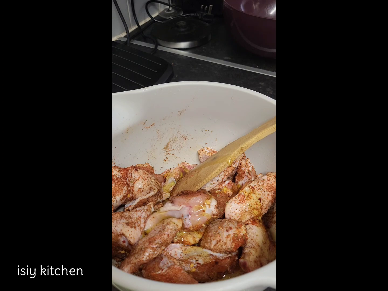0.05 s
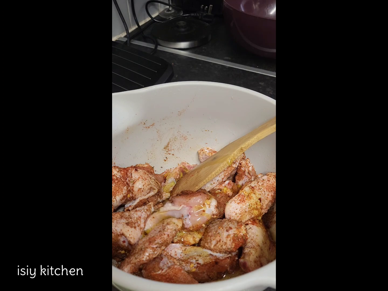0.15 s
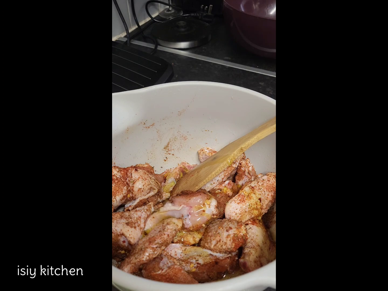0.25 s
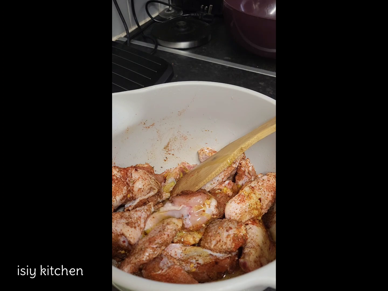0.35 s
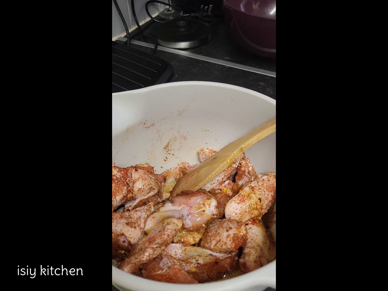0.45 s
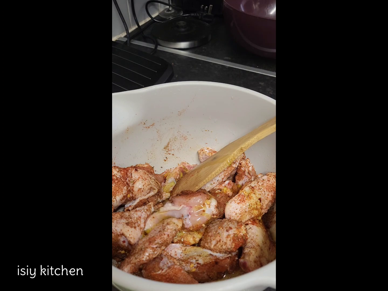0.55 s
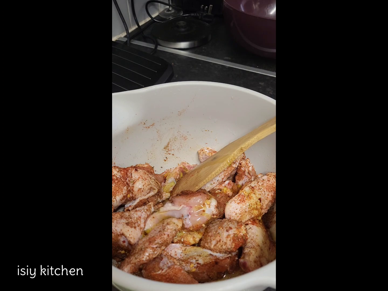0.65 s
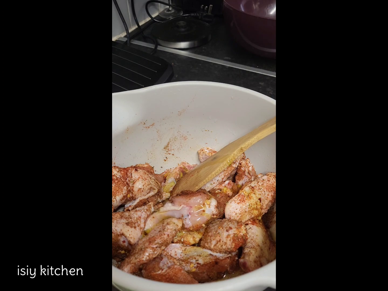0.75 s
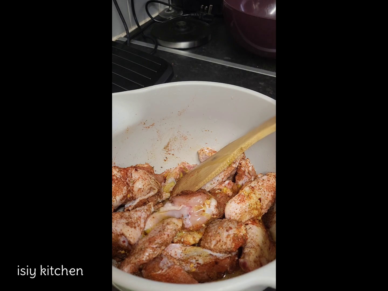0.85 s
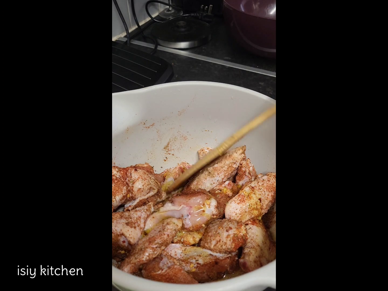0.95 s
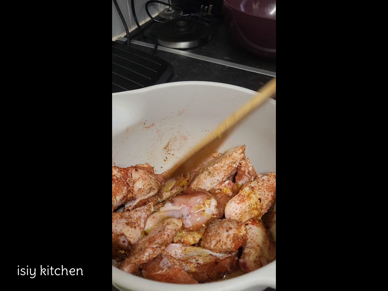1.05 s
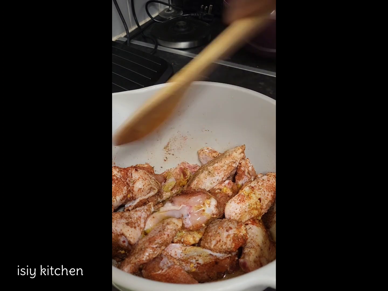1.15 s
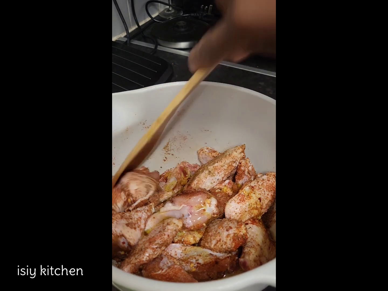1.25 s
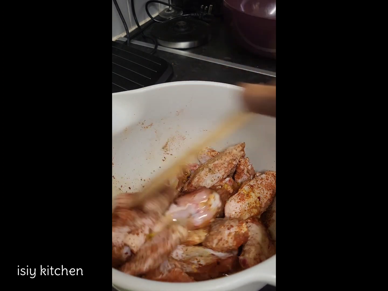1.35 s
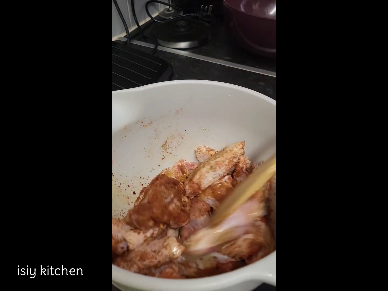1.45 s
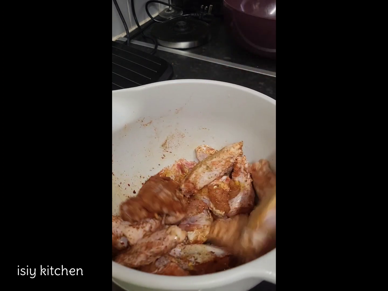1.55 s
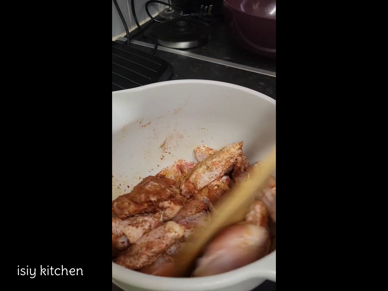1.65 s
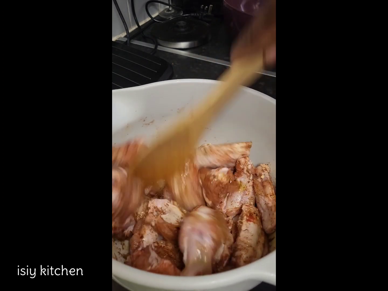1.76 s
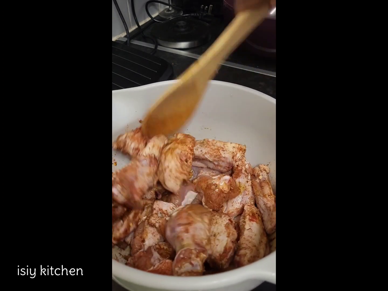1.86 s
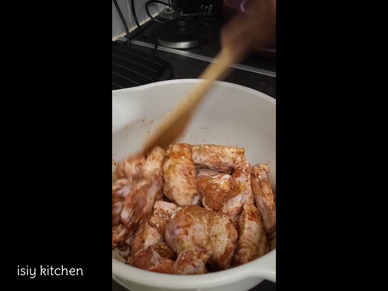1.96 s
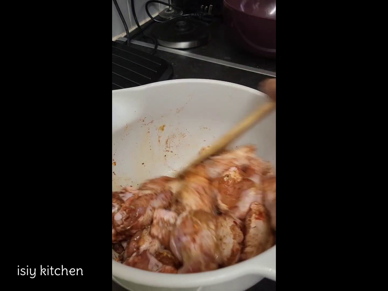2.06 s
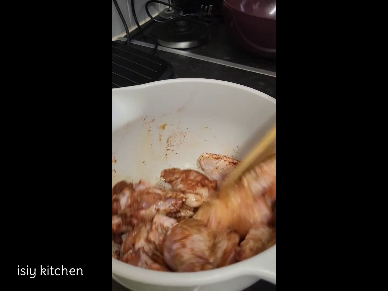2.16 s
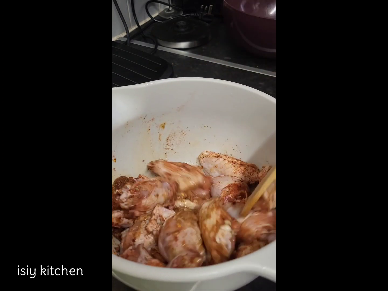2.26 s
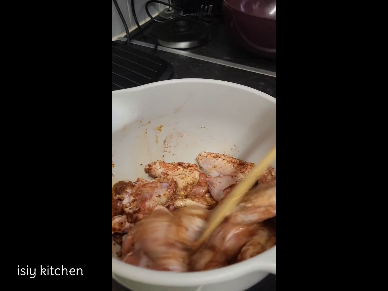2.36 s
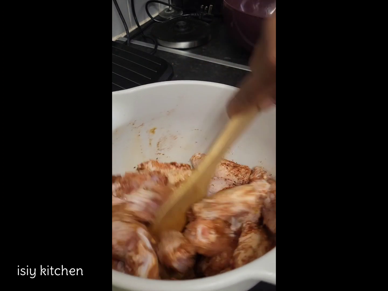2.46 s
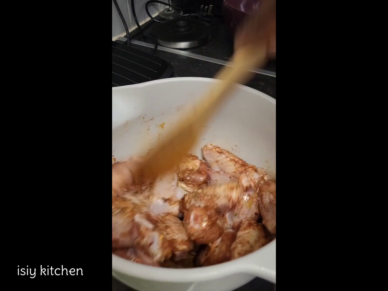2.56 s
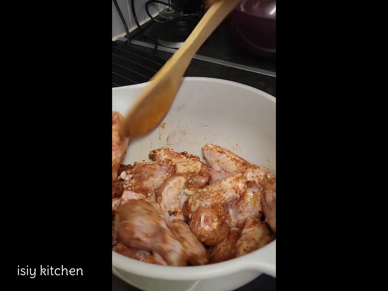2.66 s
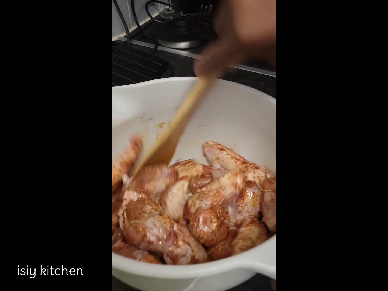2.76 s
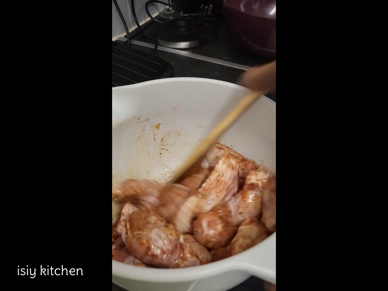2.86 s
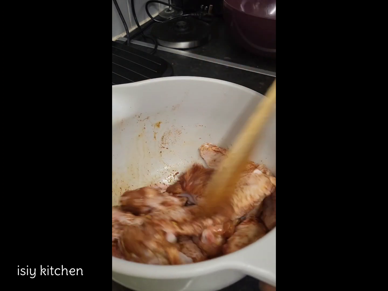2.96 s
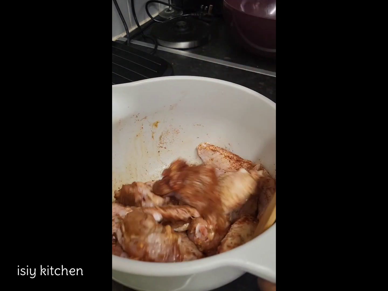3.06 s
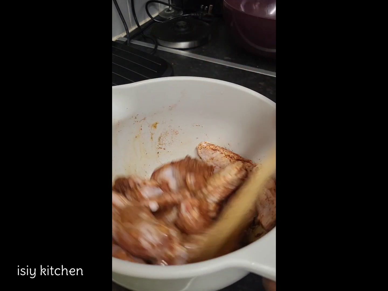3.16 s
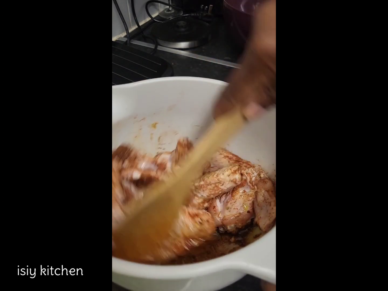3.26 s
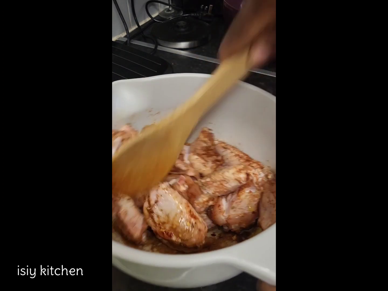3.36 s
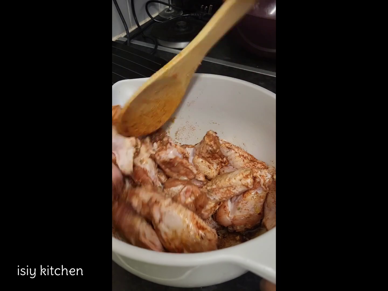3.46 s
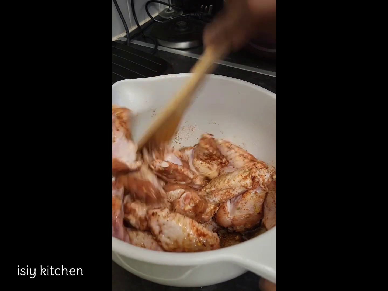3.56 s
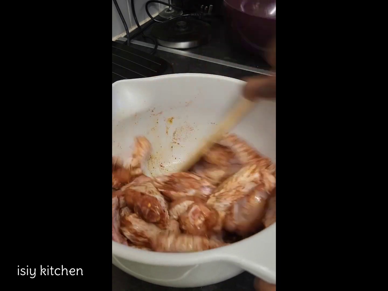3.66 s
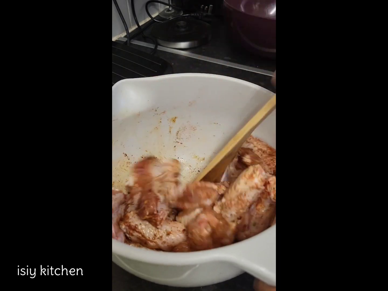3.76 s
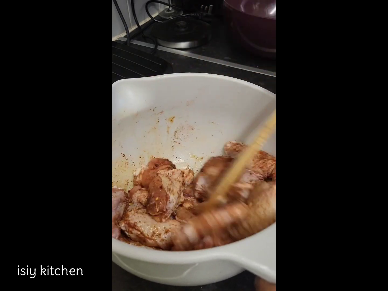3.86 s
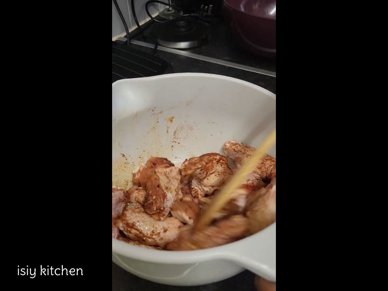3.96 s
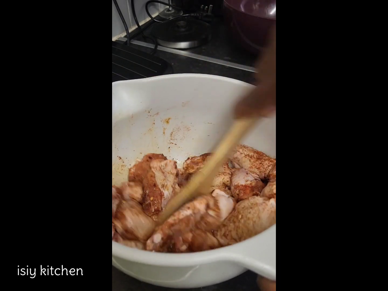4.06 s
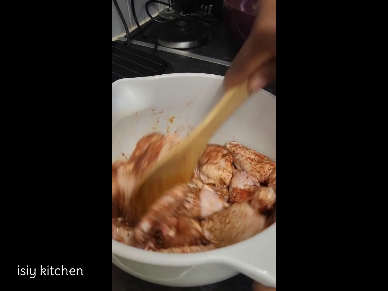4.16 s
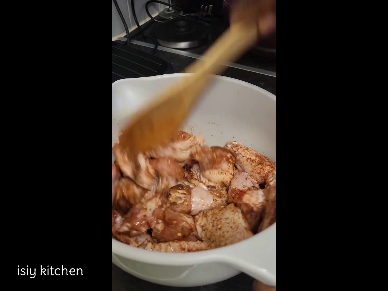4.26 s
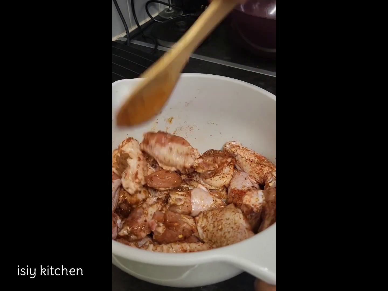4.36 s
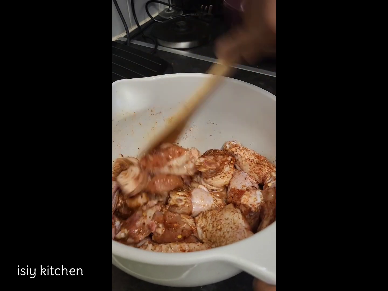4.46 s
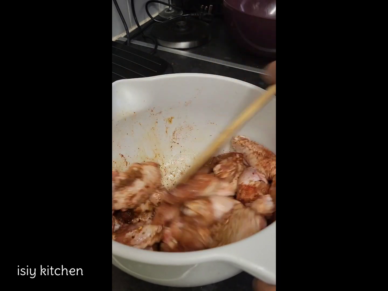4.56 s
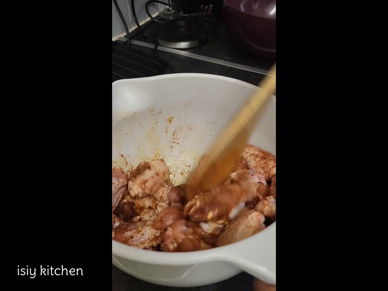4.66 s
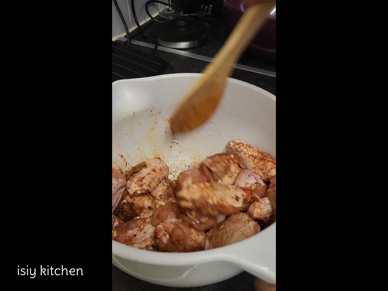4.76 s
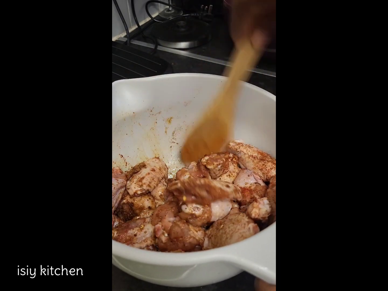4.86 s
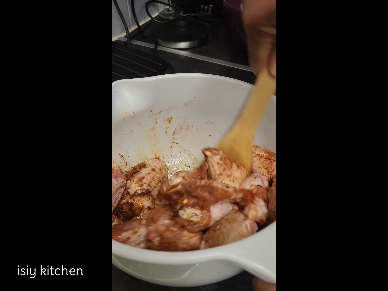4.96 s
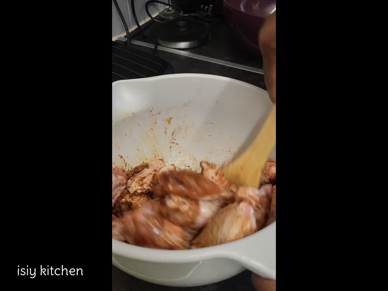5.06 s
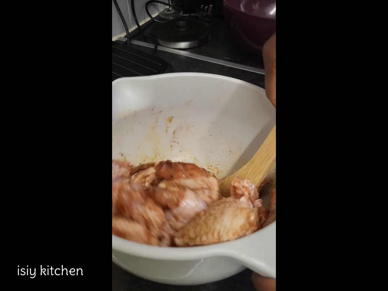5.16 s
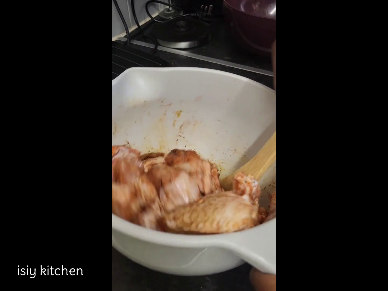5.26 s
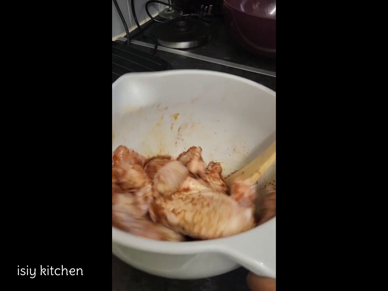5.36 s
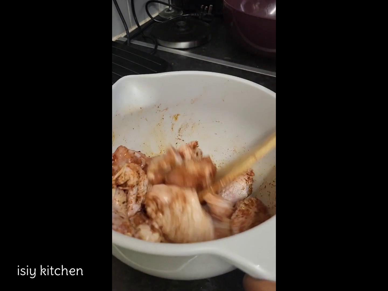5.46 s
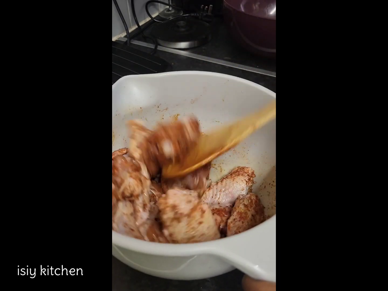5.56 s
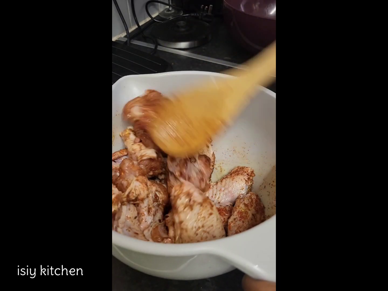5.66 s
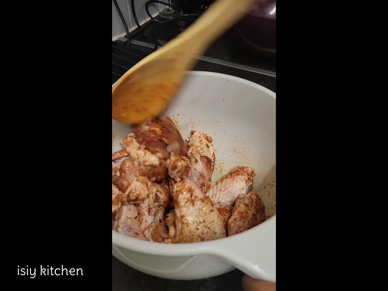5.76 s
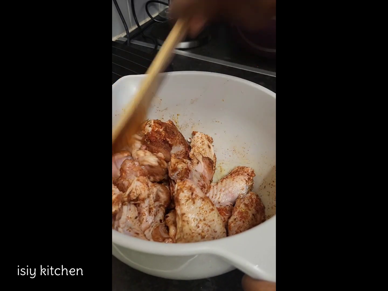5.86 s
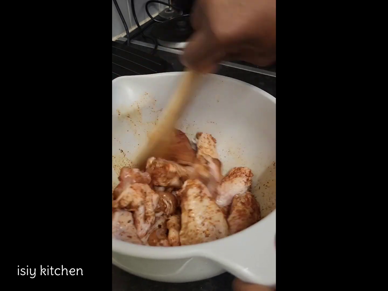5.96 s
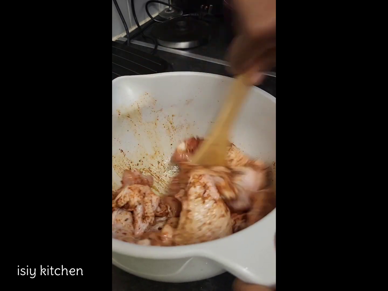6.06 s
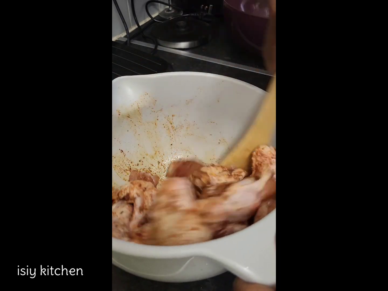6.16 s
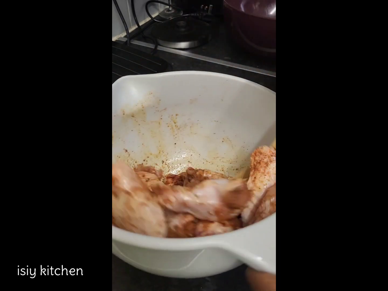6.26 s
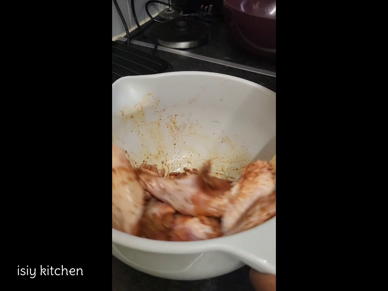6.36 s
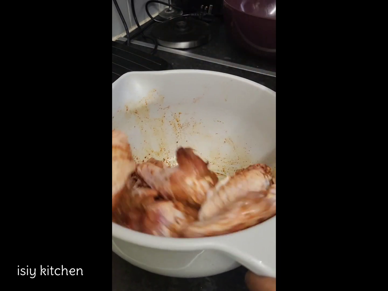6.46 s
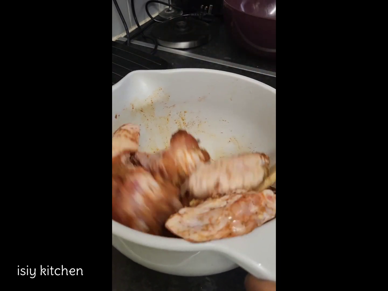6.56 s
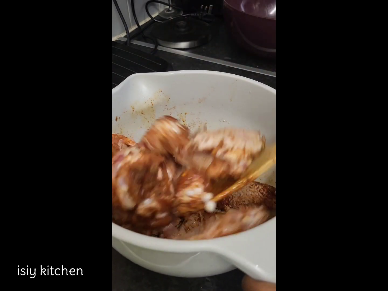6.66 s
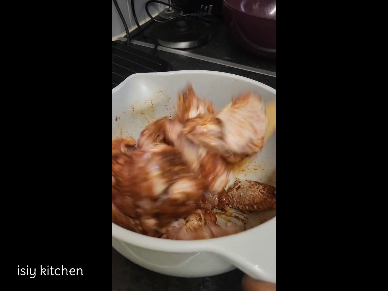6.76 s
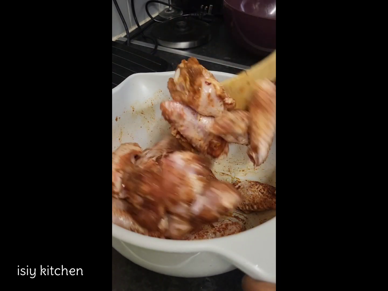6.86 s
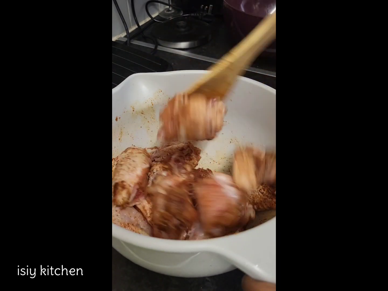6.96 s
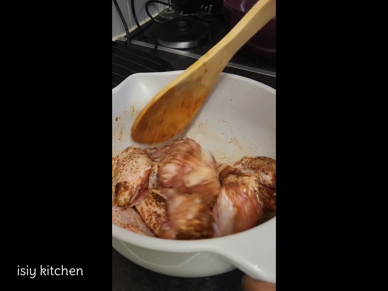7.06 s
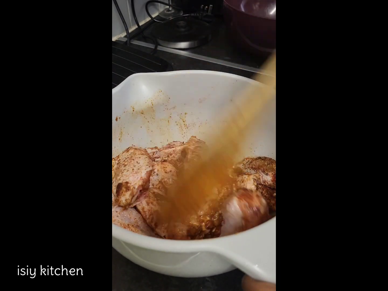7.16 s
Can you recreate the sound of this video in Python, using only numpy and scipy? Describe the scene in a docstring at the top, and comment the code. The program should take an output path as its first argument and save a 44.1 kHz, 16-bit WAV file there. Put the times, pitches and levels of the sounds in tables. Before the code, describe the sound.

Wet, sticky squelching and dull knocks as marinated chicken wings are turned with a wooden spoon in a plastic bowl.

```python
"""Soft low bumps come first: oiled raw chicken wings roll in a plastic bowl on a kitchen counter.
A wooden spoon turns them, close to a stereo microphone pair and a little to its left. Strokes knock the
bowl and drag wet skin apart in a dense squelch of tiny pops; marinade slurps through gaps and wings
flop back with soft thuds. The bowl booms briefly on the counter and the small kitchen answers.
A low hum swells and stops within the first two seconds; faint room air lies under it all."""
import sys
import numpy as np
from scipy import signal
from scipy.fft import rfft, irfft
from scipy.io import wavfile

SR = 44100
rng = np.random.default_rng(int(sys.argv[2]) if len(sys.argv) > 2 else 0)


def transcribe(signal):
    """Save signal, clipped to [-1, 1], as a 16-bit WAV file at the path in sys.argv[1]."""
    frames = np.atleast_2d(signal).T
    limited = np.clip(frames, -1, 1)
    pcm = np.round(limited * 32767).astype(np.int16)
    wavfile.write(sys.argv[1], SR, pcm)


N = 318402

# each push of the spoon, or slump of the heap, squeezes the wings: it builds, holds and relaxes
# t/s, rise/s, hold/s, fade/(dB/s), fizz/dB, fizz brightness/dB, pressed marinade/dB, rolling wings/dB
SQUEEZES = [(0.0, 0.0067, 0.074, 205, -80, -5, -63.5, -49), (0.279, 0.046, 0.017, 250, -65.5, 5, -93, -90),
            (0.466, 0.022, 0.027, 36, -81, 11, -88, -82),
            (0.91, 0.042, 0.075, 145, -53.5, -0.5, -73, -58.5),
            (1.163, 0.053, 0.042, 116, -36, 2.5, -75, -57),
            (1.312, 0.038, .12, -1.5, -53.5, 0.5, -55.5, -59.5),
            (1.752, 0.086, 0.029, 248, -42.5, 0, -50, -48), (2.013, 0.056, .02, 104, -35.5, 0.5, -36, -45),
            (2.145, .04, 0.11, 330, -44.5, 0, -43.5, -49), (2.372, 0.12, 0.016, 118, -40.5, -1, -40.5, -41),
            (2.562, 0.027, 0.11, 160, -52, -2.5, -50.5, -64),
            (2.794, 0.039, 0.024, 91, -38, -3.5, -36, -50.5),
            (2.995, 0.041, 0.026, 300, -50.5, 3, -45.5, -51.5),
            (3.116, 0.19, 0.072, 145, -38, -1, -41, -44),
            (3.621, 0.04, 0.15, 112, -40.5, -1.5, -39.5, -43.5),
            (3.916, 0.067, .05, 150, -53.5, 0, -58, -63), (4.062, .11, 0.01, 179, -42, -2, -36.5, -41),
            (4.192, 0.035, 0.026, 137, -41, -2.5, -46, -51), (4.478, 0.014, .025, 141, -38, 1, -38, -46),
            (4.582, 0.027, 0.053, 157, -44.5, -1.5, -58, -67),
            (4.88, 0.075, 0.022, 143, -34.5, -2, -42, -44.5),
            (5.02, 0.14, 0.031, 105, -38.5, -3.5, -37, -49.5),
            (5.361, 0.14, 0.023, 80, -45, -3, -50.5, -48), (5.93, 0.064, 0.016, 67, -35, -3.5, -32, -40),
            (6.086, 0.018, 0.021, 42, -35.5, -3.5, -37.5, -64),
            (6.272, .05, 0.033, 49, -40.5, -1.5, -39.5, -43), (6.64, .08, 0.056, 210, -61, 12, -46, -45),
            (6.81, 0.012, .006, 296, -40.5, 2, -54, -48), (6.915, 0.0085, 0.014, 77, -53.5, 4.5, -71, -77),
            (7.049, 0.013, .01, 176, -54.5, 11.5, -88, -65)]
# spectra of rolling wings, pressed marinade and parting skin: f/Hz, level/dB
TUMBLE_COLOUR = [(20, -16), (45, -1), (70, -5.5), (115, -2), (180, -3.5), (280, 1), (500, -14.5),
                 (900, -16), (2500, -61)]
SQUELCH_COLOUR = [(150, -20), (400, -1), (620, 0), (820, -17), (1150, 0.5), (2000, -11), (2800, -1.5),
                  (4500, -13.5), (9000, -14)]
FIZZ_COLOUR = [(300, -4), (1000, -7.5), (2200, 1.5), (3200, -3.5), (4600, -0.5), (6300, -4), (8000, -2),
               (9800, -11), (14500, -10.5), (16000, -23.5)]
# spectrum of the still kitchen: f/Hz, level/dB
AIR_COLOUR = [(15, -57), (25, -19), (80, -4.5), (92, -8), (114, -3), (141, -22.5), (416, -33.5), (624, -41),
              (1610, -42.5), (2760, -35), (4030, -48.5), (8360, -41.5), (16000, -49)]
# blows of spoon and wings on the bowl; hardness is high for bare wood, low for soft meat
# t/s, knock f/Hz, strength/dB, hardness/dB, boom/dB, height of the knock's ring/dB
BLOWS = [(0.015, 180, 0, -53, -19, 11), (0.04, 170, -8.5, -47, -10, 20), (0.084, 183, -6.5, -48, -36, 16),
         (0.954, 570, -2.5, -18, -10, 9.5), (0.999, 460, 1.5, -37, 3.5, -5),
         (1.478, 1250, 0.5, 10.5, -8, -1), (1.5959, 1080, 18, -7.5, -3, 14),
         (1.846, 282, 23.5, -44.5, -28, -1), (1.9956, 240, 15, -1.5, 2.5, 9.5),
         (2.388, 484, 19, -52, -20, 10.5), (2.719, 970, 8.5, -12, 5, 8.5), (2.804, 950, 8.5, -6, 6, 17.5),
         (2.824, 357, 20, -34, 9, 15.5), (2.87, 110, 4, -11, 15.5, -1), (3.124, 850, 19.5, 3.5, -11, 12.5),
         (3.132, 480, 15, -17, -18, 14.5), (3.6375, 650, 16, 2, 7, 10.5),
         (3.747, 610, 13.5, -2.5, -13, 2.5), (4.4402, 670, 17, -5.5, 3.5, 14),
         (4.517, 343, 15.5, -28, -6, 4), (4.877, 260, 24, -4, 8, 5), (4.978, 116, 11, -35, 7.5, 11.5),
         (5.223, 315, 8, -31, -20, 4), (5.392, 580, 1, -2, -18, 2), (5.469, 520, 18, -12, 3, 14),
         (5.482, 325, 26, -12, 5, 9.5), (5.712, 178, 8, -41, -7, 9), (5.749, 202, 2.5, -30, -10, 11),
         (5.9172, 1110, 9.5, -0.5, -7, 15), (6.105, 1300, 7.5, -3.5, 6, 9.5),
         (6.2916, 1170, 23, -11.5, -15, 13), (6.544, 440, 1.5, -12, -4, 8.5), (6.703, 356, 13.5, -7, 1, 17),
         (6.723, 428, 11, -45, -2.5, 14), (6.785, 587, 1, -12, -10, 15.5),
         (6.803, 494, 5.5, -10.5, -6, 17.5), (6.831, 506, 0.5, -1, -7, 16.5),
         (6.9269, 497, 25.5, -18, 3, 8.5), (7.064, 475, 9.5, -8, 3, 14), (7.072, 311, 16.5, -46, 8, 6.5)]
# where a blow's boom, thud, knock, clack and tick lie: f/Hz
PARTS_HZ = [70, 250, 780, 2050, 7000]
# wet skin smacking free of spoon or bowl: t/s, level/dB
SMACKS = [(0.835, -31), (0.999, -21), (1.421, -19), (1.4778, 4.5), (2.373, -11.5), (2.424, -28),
          (2.985, -10), (3.123, 3.5), (4.493, -4), (4.607, -11), (4.655, -7), (5.78, -10.5), (5.9161, -4),
          (6.82, 1), (7.064, -33)]
# a smack's parts relative to its tick: boom/dB, thud/dB, knock/dB, clack/dB
SMACK_PARTS_DB = (-9.5, -10, -1, 4)
# marinade sucked through a gap between wings: t/s, length/s, level/dB, open gap f/Hz
SLURPS = [(2.086, 0.054, -30, 1800), (2.145, 0.1, -31, 1410), (2.467, 0.11, -38.5, 1670),
          (2.538, 0.16, -37.5, 1380), (3.236, 0.09, -35, 1360), (4.123, 0.21, -34.5, 1460),
          (5.106, .16, -31.5, 1240), (6.074, 0.11, -30, 1460), (6.297, .18, -34.5, 1200),
          (6.456, 0.075, -36, 1770), (6.587, .1, -42.5, 1420)]
# modes of the bowl on the counter: f/Hz, level over the direct blow/dB, t60/s
BOWL_MODES = [(60.9, 10, 0.23), (110, 14.5, 0.16), (170, 10.5, 0.17), (219, -5.5, 0.098), (258.3, 6, 0.19),
              (332.2, 4.5, 0.095), (455, 8, 0.06), (551, 7, 0.13), (618.8, 12.5, 0.08), (925, -1.5, 0.04),
              (1030, -8, 0.01), (1546, -43.5, 0.063), (1950, -4.5, .1)]
# reverberation of the kitchen: f/Hz, t60/s
KITCHEN_DECAY = [(100, 0.39), (220, 0.088), (450, 0.2), (1000, 0.19), (3000, 0.23), (8000, 0.14),
                 (15000, 0.2)]
# balance of the wet sounds at the microphone pair: f/Hz, left minus right/dB
BALANCE = [(200, 2), (400, 3), (700, 3.5), (1400, 5), (3000, 1), (6000, 0.3), (14000, 0.3)]


def amp(db):
    return 10 ** (np.asarray(db) / 20)


def unit(x):
    return x / np.sqrt(np.mean(x ** 2) + 1e-20)


def read(points, hz):
    """A spectrum table, joined on a log-frequency axis."""
    f, value = np.transpose(points)
    return np.interp(np.log(hz + 1), np.log(f + 1), value)


def add(mix, s, sound):
    part = mix[:, max(round(s * SR), 0):][:, :sound.shape[1]]
    part += sound[:, :part.shape[1]]


def causal(db):
    """The most compact one-sided pulse with this dB spectrum."""
    cepstrum = irfft(np.log(amp(np.maximum(db, -100))))
    half = len(cepstrum) // 2
    cepstrum[1:half] *= 2
    cepstrum[half + 1:] = 0
    return irfft(np.exp(rfft(cepstrum)))[:half]


def ring(x, response):
    return signal.oaconvolve(np.atleast_2d(x), np.atleast_2d(response), axes=1)[:, :N]


def bins(size=4096):
    return np.fft.rfftfreq(size, 1 / SR)


def colour(x, points):
    return ring(x, causal(read(points, bins())))


def wander(per_s):
    """A smooth random drift of unit size."""
    knots = rng.standard_normal(N)
    return unit(np.interp(np.arange(N) / SR * per_s, np.arange(N), knots))


def diffuse(size):
    """Echoes from all sides: long waves reach both microphones partly alike, short ones do not."""
    spectra = rfft(rng.standard_normal((3, size)))
    spectra /= abs(spectra)
    shared = 0.49 / (1 + (bins(size) / 700) ** 2)
    return irfft(np.sqrt(shared) * spectra[2] + np.sqrt(1 - shared) * spectra[:2]) * np.sqrt(size)


def spot(near_db, near_s, lag_samples=4, size=1024):
    """Path from a place in the bowl: direct sound, later at the right microphone, and wall echoes."""
    t = np.arange(size) / SR
    echoes = diffuse(size) * np.exp(-t / near_s) * (t > .0007)
    # the close echoes carry little bass, keeping each knock's low end steady
    echoes = signal.lfilter(*signal.butter(1, 700, 'high', fs=SR), echoes)
    path = amp(near_db) * echoes / np.linalg.norm(echoes[0])
    path[0, 0] += 1
    path[1, lag_samples + rng.integers(-1, 2)] += 1
    return path / np.sqrt(1 + amp(near_db) ** 2)


def bowl(x):
    """A push reaches the microphones directly and through the bowl's modes."""
    t = np.arange(SR // 2) / SR
    response = (t == 0) * 1.
    for hz, db, t60 in BOWL_MODES:
        decay = np.log(1000) / t60
        response += amp(db) * 2 * decay / SR * np.exp(-decay * t) * np.cos(2 * np.pi * hz * t)
    return ring(x, response)


def kitchen(x, wet_db, size=22050):
    """The small room's tail behind the close sound, each band dying at its own speed."""
    t = np.arange(size) / SR
    hz, age, bands = signal.stft(diffuse(size), SR, nperseg=256)
    fade = amp(-60 * age / read(KITCHEN_DECAY, hz)[:, None])
    tail = signal.istft(bands * fade, SR, nperseg=256)[1][:, :size]
    tail *= np.clip((t - .004) / 0.0027, 0, 1)  # the first echoes take 4 ms
    return x + ring(x, amp(wet_db) * tail / np.linalg.norm(tail[0]))


def pops(per_s, spread_db, clump_db, clumps_per_s, near_db, places=12):
    """Tiny films burst around the bowl, mostly small, louder and softer in clumps."""
    size = amp(spread_db * np.minimum(rng.exponential(1, N), 4.5)) * rng.choice([-1, 1], N)
    train = size * (rng.random(N) < per_s / SR) * amp(clump_db * wander(clumps_per_s))
    place = rng.integers(0, places, N)
    paths = [spot(near_db, near_s=0.0045) for _ in range(places)]
    return unit(sum(ring(train * (place == k), path) for k, path in enumerate(paths)))


def squeezing(settle_db=-16.5, settle_db_per_s=50):
    """Gains for fizz, its brightness, marinade and rolling wings; overlapping squeezes add in power."""
    t = np.arange(N) / SR
    power, weighted_bright = np.full((3, N), 1e-12), np.zeros(N)
    for start, rise, hold, fade, fizz_db, bright_db, press_db, roll_db in SQUEEZES:
        at = slice(round(start * SR), round((start + 1) * SR))
        age = t[at] - start
        relaxed = np.maximum(age - rise - hold, 0)
        settling_db = settle_db - settle_db_per_s * relaxed  # the heap goes on crackling quietly
        effort = np.clip(age / rise, 0, 1) * amp(np.maximum(-fade * relaxed, settling_db))
        parts = (amp([[fizz_db], [press_db], [roll_db]]) * effort) ** 2
        power[:, at] += parts
        weighted_bright[at] += bright_db * parts[0]
    peel, press, roll = np.sqrt(power)
    return peel, amp(weighted_bright / power[0]), press, roll


def tumble(roll):
    """Wings roll and rub against the bowl in soft low bumps."""
    bumps = pops(per_s=500, spread_db=2, clump_db=1.8, clumps_per_s=30, near_db=-4)
    rolling = unit(bowl(colour(bumps, TUMBLE_COLOUR))) * roll
    return amp(1.5) * kitchen(rolling, wet_db=-13)


def squelch(press):
    """Marinade squeezed between the wings: larger pops that ring the bowl."""
    bursts = pops(per_s=3000, spread_db=1.5, clump_db=6, clumps_per_s=90, near_db=9)
    pressed = unit(bowl(colour(bursts, SQUELCH_COLOUR))) * press
    return kitchen(pressed, wet_db=-5)


def fizz(peel, bright):
    """Oily skin peels apart in thousands of tiny pops a second; thinner films sound brighter."""
    bursts = pops(per_s=6000, spread_db=2.8, clump_db=2, clumps_per_s=120, near_db=5)
    skin = unit(colour(bursts, FIZZ_COLOUR))
    dull = signal.lfilter(*signal.butter(1, 4500, fs=SR), skin)
    tilted = dull / bright + (skin - dull) * bright
    return amp(3) * kitchen(tilted * peel, wet_db=-8.5)


def crackle(peel):
    """Now and then a larger sticky film snaps with its own pitch, also while the spoon is slow."""
    t = np.arange(160) / SR
    snaps = np.zeros((2, N))
    for hz in np.geomspace(3200, 11000, num=6):
        snap = np.exp(-t * hz / 1.5) * np.sin(2 * np.pi * hz * t)
        bursts = pops(per_s=7, spread_db=1.5, clump_db=2, clumps_per_s=20, near_db=-5, places=2)
        snaps += ring(bursts, snap / np.linalg.norm(snap))
    size = peel / (1 + peel / amp(-47))  # a single snap can only get so loud
    return amp(-7) * kitchen(unit(snaps) * size, wet_db=-7)


def air():
    """Room tone: rumble mostly common to both microphones, hiss separate."""
    mid, side = rng.standard_normal((2, N))
    side = colour(side, [(150, -8), (1500, 2), (4000, 0.5)])
    pair = mid + np.array([[1], [-1]]) * side
    return amp(-59.5) * unit(colour(pair, AIR_COLOUR))


def blow(knock_hz, boom_db, thud_db, knock_db, clack_db, tick_db, ring_db, pan_db,
         clack_hz=1800, clack_ring_db=8, ring_width=0.18):
    """One contact: soft meat gives mostly boom and thud, wood a pitched knock and clack, oil a tick."""
    hz = bins()
    parts_db = (boom_db, thud_db - 0.5, knock_db - 7.5, clack_db - 2, tick_db)
    shape = [(25, boom_db - 22), *zip(PARTS_HZ, parts_db), (16000, tick_db - 7)]
    ripple = [(1100, 2), (1450, -5), (2200, -1.55), (3600, 0.5), (6000, 3), (8200, 1.3), (10000, -5.5)]
    db = read(shape, hz) + read(ripple, hz)
    for pitch, height_db in ((knock_hz, ring_db), (clack_hz, clack_ring_db)):  # bowl and spoon ring
        detune = 2 * (hz / pitch - 1) / ring_width
        db += 10 * np.log10(1 + (amp(height_db) ** 2 - 1) / (1 + detune ** 2))
    lean_db = pan_db / 2 * hz ** 2 / (hz ** 2 + 350 ** 2)  # bass bends round to both microphones
    pulse = np.array([causal(db + lean_db), causal(db - lean_db)])
    # the wall takes a few cycles to swing up at each pitch
    for pitch in (knock_hz, clack_hz):
        pole = np.exp((-2j - 1) * np.pi * pitch / SR)
        wall = np.poly([pole, pole.conjugate()]).real
        pulse = signal.lfilter(wall[::-1], wall, pulse)
    return ring(pulse, spot(near_db=1, near_s=0.0041))


def knocks(smack_hz=1200):
    """Spoon and wings strike the bowl, harder contacts sounding brighter; wet skin smacks free."""
    force = np.zeros((2, N))
    for s, hz, db, hard_db, boom_db, ring_db in BLOWS:
        knock_db = db + 0.5 + 0.43 * hard_db  # grows with hardness, less steeply than the clack
        clack_db = db + hard_db
        tick_db = clack_db - 28
        add(force, s, blow(hz, boom_db, db, knock_db, clack_db, tick_db, ring_db, pan_db=4))
    for s, db in SMACKS:
        add(force, s, blow(smack_hz, *np.add(SMACK_PARTS_DB, db), tick_db=db, ring_db=5.5, pan_db=0))
    return amp(-3.5) * kitchen(bowl(force), wet_db=-6)


def hum(start_s=0.58, stop_s=1.93, rise_s=0.08, fall_s=0.065, swell_db_per_s=18):
    """A low hum of two wavering tones swells and stops, dead centre."""
    t = np.arange(N) / SR
    tones = np.zeros(N)
    for hz, db in ((64.3, 5), (108, -6)):
        pitch = hz + 0.34 * wander(5.1)
        tones += amp(db) * np.sin(2 * np.pi * np.cumsum(pitch) / SR)
    gate = np.clip(np.minimum((t - start_s) / rise_s, (stop_s - t) / fall_s), 0, 1)
    return unit(tones) * amp(-60.5 + swell_db_per_s * (t - start_s)) * gate


def resonate(x, hz, width_hz=700):
    """A resonance of gain about 1 that follows the curve hz."""
    turn = np.exp(2j * np.pi * np.cumsum(hz) / SR)
    radius = np.exp(-np.pi * width_hz / SR)
    return 2 * (turn * signal.lfilter([1 - radius], [1, -radius], x / turn)).real


def slurps():
    """Pops ring a trembling air gap that opens and shuts in one arch: louder and lower when wide."""
    drive = pops(per_s=3000, spread_db=0, clump_db=4.5, clumps_per_s=160, near_db=0)
    tremble = 2 ** (.24 * wander(130))
    sucked = np.zeros((2, N))
    for s, length, db, hz in SLURPS:
        at = np.arange(round(s * SR), round((s + length) * SR))
        opening = np.sin(np.linspace(0, np.pi, len(at)))
        pitch = hz * (1 + .15 * (1 - opening)) * tremble[at]
        gap = resonate(resonate(drive[:, at], pitch), pitch)
        add(sucked, s, unit(gap) * amp(db) * opening)
    return amp(-6) * kitchen(sucked, wet_db=-2)


def scene():
    """At the counter: wet sounds close up and a little to the left, with knocks, hum and room tone."""
    peel, bright, press, roll = squeezing()
    wet = fizz(peel, bright) + crackle(peel) + squelch(press) + slurps() + tumble(roll)
    lean_db = read(BALANCE, bins()) / 2
    return knocks() + ring(wet, [causal(lean_db), causal(-lean_db)]) + hum() + air()


def record(dry):
    """The microphone signals clip just under full scale, then pass a 16 kHz band limit."""
    lowpass = signal.firwin(401, 16000, window=("kaiser", 9), fs=SR)
    return signal.oaconvolve(np.clip(dry, -.9, .9), lowpass[None], "same", axes=1)


dry = scene()
out = record(dry)
transcribe(out)
```